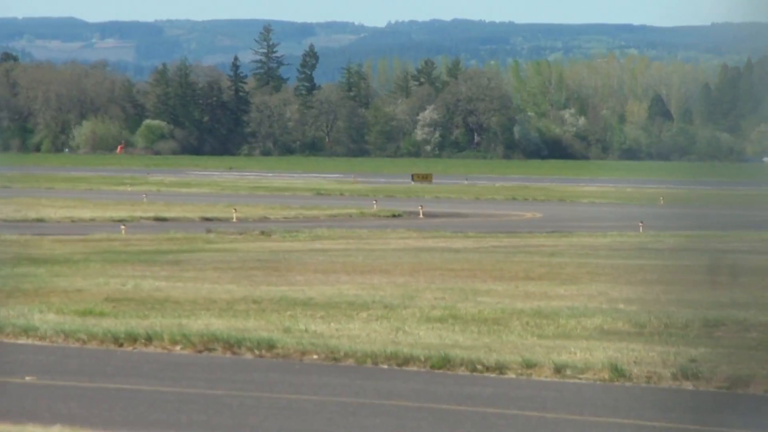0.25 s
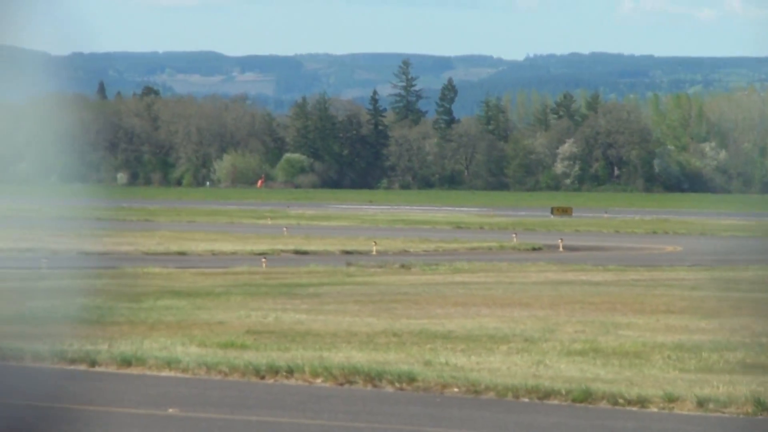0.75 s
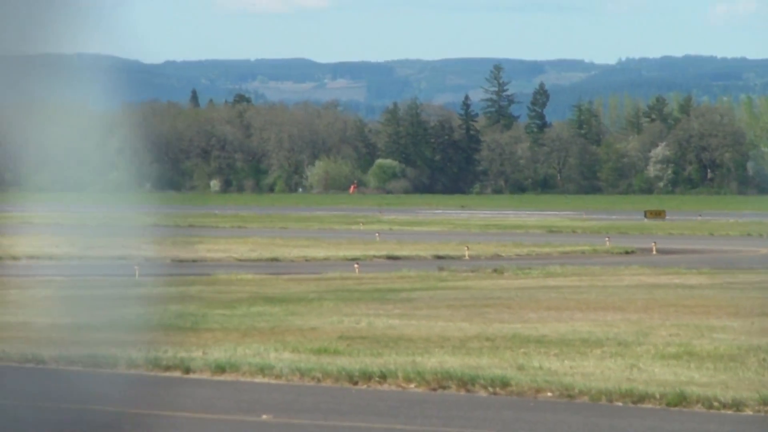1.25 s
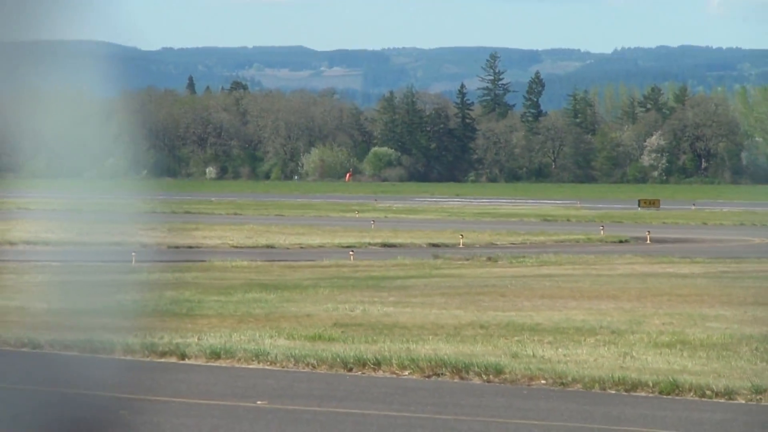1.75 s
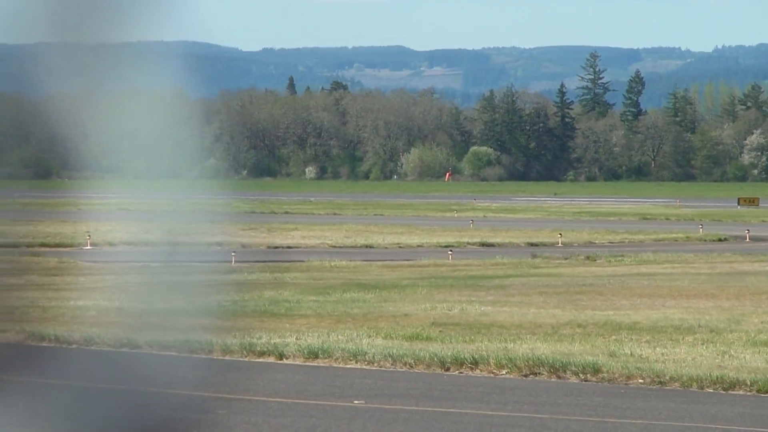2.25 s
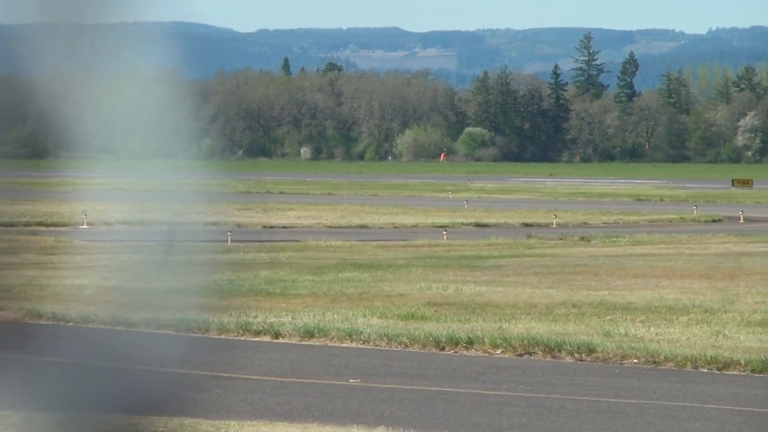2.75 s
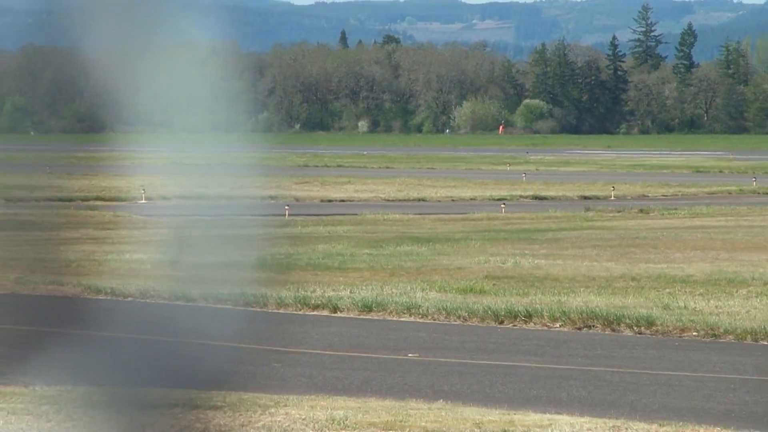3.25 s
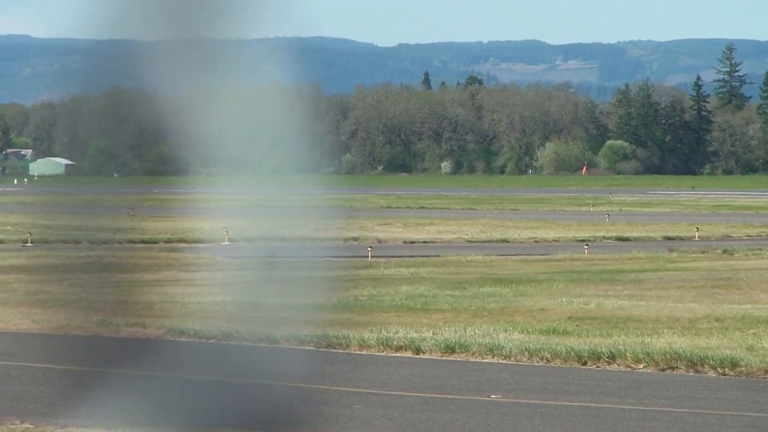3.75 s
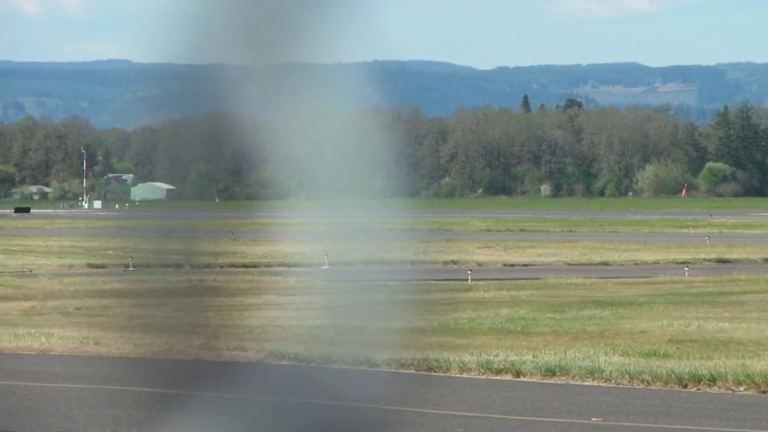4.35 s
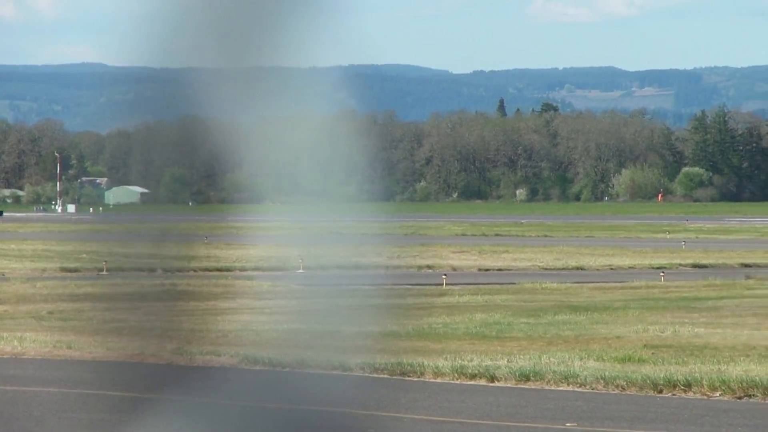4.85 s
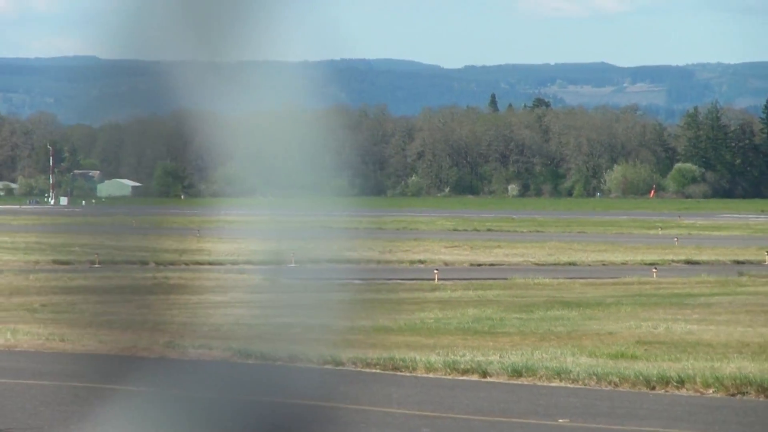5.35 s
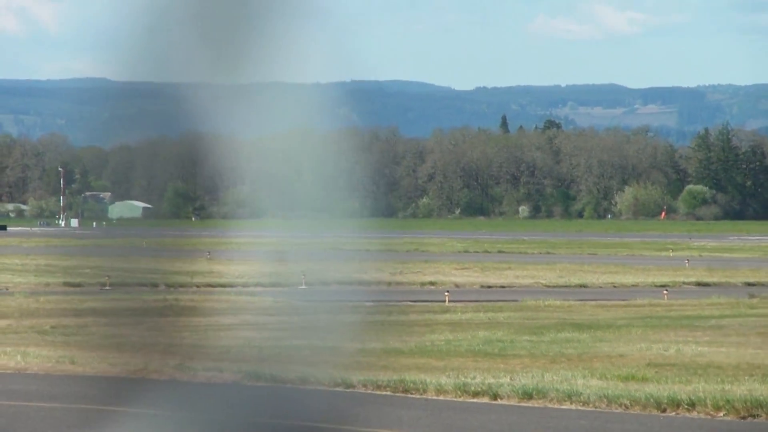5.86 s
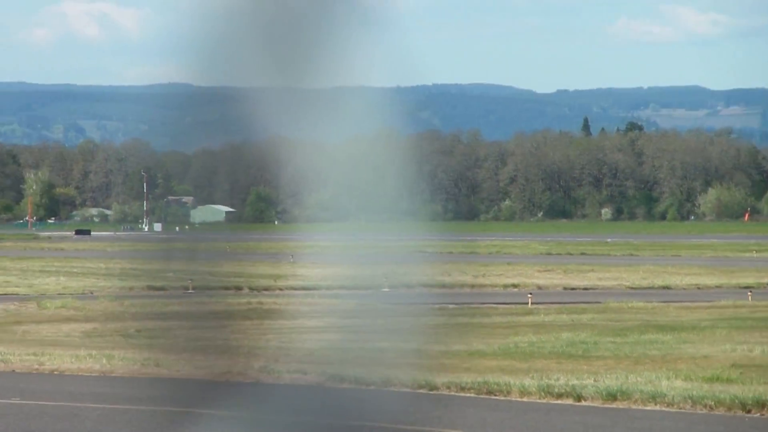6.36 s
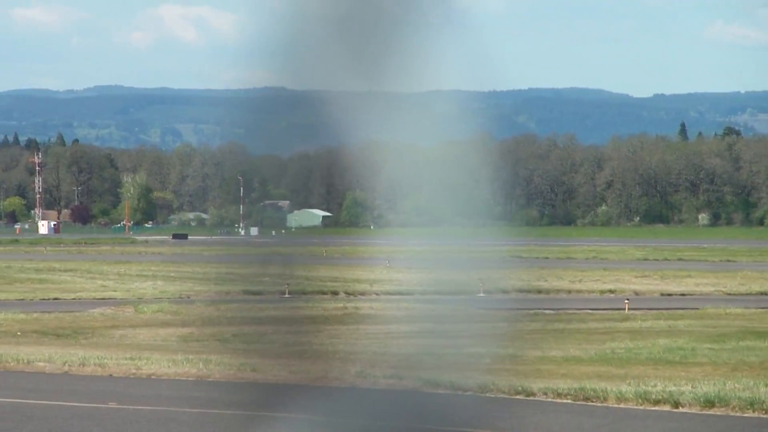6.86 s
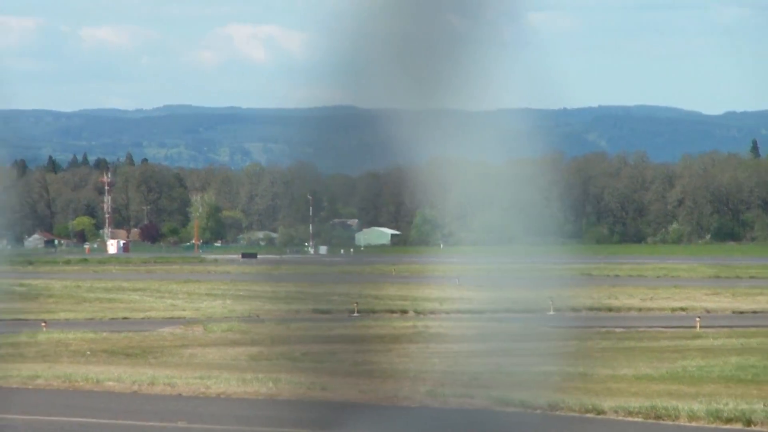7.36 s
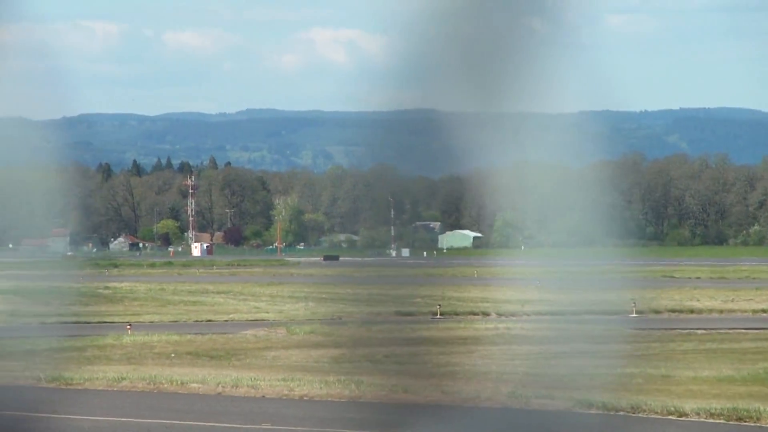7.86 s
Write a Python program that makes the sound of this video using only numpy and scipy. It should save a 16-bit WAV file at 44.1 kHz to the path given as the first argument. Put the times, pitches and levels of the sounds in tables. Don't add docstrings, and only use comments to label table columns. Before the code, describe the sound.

Heavy wind buffets the left microphone and gradually eases, while a camera lens motor purrs and ticks rapidly on the right over faint distant jet roar.

```python
import sys
import numpy as np
from scipy import signal
from scipy.fft import rfft, irfft, next_fast_len
from scipy.io import wavfile
from scipy.ndimage import uniform_filter1d

SR = 44100
rng = np.random.default_rng(int(sys.argv[2]) if len(sys.argv) > 2 else 0)


def elevation(decibels):
    levels = np.asarray(decibels, float)
    return 10 ** (levels / 20)


def master_out(mix):
    frames = np.transpose(np.atleast_2d(mix))
    ceiling = np.clip(frames, -1, 1)
    pcm = np.round(ceiling * 32767).astype(np.int16)
    wavfile.write(sys.argv[1], SR, pcm)


N = 358091
FRAME_HZ, FIRST_FRAME_S = 29.97, 0.0071
DRIVE_START_S, DRIVE_END_S = 5.229, 6.23


def rms_one(x):
    return x / np.sqrt(np.mean(x ** 2) + 1e-20)


def in_time(rows):
    s, level_db = np.transpose(rows)
    return np.interp(np.arange(N) / SR, s, level_db)


def colour(x, spectrum):
    size = next_fast_len(N + 8192)
    hz = np.maximum(np.arange(size // 2 + 1) * SR / size, 1)
    points = np.vstack([spectrum, (1.5 * spectrum[-1][0], -120)])
    gain_db = np.interp(np.log(hz), np.log(points[:, 0]), points[:, 1])
    return irfft(rfft(x, size) * elevation(gain_db), size)[..., :N]


def drift(rate_hz):
    r = np.exp(-2 * np.pi * rate_hz / SR)
    settle = 9000
    return rms_one(signal.lfilter([1], [1, -2 * r, r * r], rng.standard_normal(N + settle))[settle:])


def clicks(times, heights):
    out = np.zeros(N)
    at = np.clip(np.round(np.asarray(times) * SR).astype(int), 0, N - 1)
    np.add.at(out, at, heights)
    return out


def burst(times, heights, decay_s):
    envelope = signal.lfilter([1], [1, -np.exp(-1 / (decay_s * SR))], clicks(times, heights))
    return envelope * rng.standard_normal(N)


def ring(x, hz, width_hz):
    r, w = np.exp(-np.pi * width_hz / SR), 2 * np.pi * hz / SR
    return signal.lfilter([0, np.sin(w)], [1, -2 * r * np.cos(w), r * r], x + 1e-18)


def soften(x, hz):
    return signal.sosfilt(signal.butter(6, hz, fs=SR, output="sos"), x)


def high_pass(x, hz):
    return signal.sosfilt(signal.butter(2, hz, "high", fs=SR, output="sos"), x)


def band(x, low_hz, high_hz):
    return signal.sosfiltfilt(signal.butter(2, [low_hz, high_hz], "band", fs=SR, output="sos"), x)


# t/s, level/dB
GUST = [(0, -20.5), (1.2, -20), (2.8, -21.5), (3.3, -25), (3.8, -24.5), (4.2, -29), (4.42, -28), (4.7, -27),
        (5.4, -31.5), (5.7, -32), (6.0, -20.5), (6.24, -37.5), (6.5, -24), (6.88, -34), (7.1, -24),
        (7.4, -28.5), (7.9, -28.5), (8.12, -25)]
# t/s, peak level/dB, sign (+ pushes, - sucks)
PUFFS = [(0.209, -3.5, -1), (0.335, -4.2, -1), (0.634, -5.7, -1), (0.979, -5.4, 1), (1.173, -4.8, -1),
         (1.229, -4.2, -1), (1.661, -6.4, 1), (1.907, -5.5, 1), (2.065, -3.5, -1), (2.195, -5.0, -1),
         (2.281, -4.9, 1), (2.389, -3.3, -1), (2.915, -7.4, 1), (3.465, -4.6, 1), (3.499, -6.3, -1),
         (4.097, -11.4, -1), (4.632, -11.3, 1), (4.856, -9.9, 1), (5.051, -9.5, 1), (5.577, -8.2, 1),
         (5.841, -9.3, -1), (5.88, -8.6, -1), (5.993, -6.5, 1), (6.442, -9.3, -1), (6.636, -10.2, 1),
         (7.036, -11.4, -1), (7.17, -11.0, -1), (7.567, -12.0, -1), (7.836, -9.5, -1), (8.036, -6.1, -1)]
# f/Hz, level/dB per Hz
WIND_COLOUR = [(30, -38.5), (50, -38), (80, -17.5), (130, -8), (200, 0), (280, 3), (400, -0.5), (550, -8),
               (750, -19), (1000, -31), (1300, -44), (1800, -50.5), (2600, -63)]
# f/Hz, level/dB
LEE_COLOUR = [(30, -31.5), (60, -21.5), (120, -4), (250, -3.5), (700, -5.5), (1100, -36.5), (2000, -35)]
# t/s, peak level/dB, sign
LEE_PUFFS = [
    (2.038, -18, -1),
    (5.04, -21.5, 1),
    (5.151, -21.5, 1),
    (5.792, -32, 1),
]


def wind():
    bright_follows = 2.34
    calm_db = in_time(GUST) + 26
    swell_db = swell()
    trend_db = uniform_filter1d(calm_db, int(0.48 * SR), mode="nearest")
    level_db = -26 + calm_db + swell_db + 1.0 * drift(12.0)
    bass_db = -28.5 + 0.47 * calm_db + 0.64 * drift(2.6)
    bright_db = -38 + bright_follows * trend_db + 0.56 * swell_db + 3.4 * drift(3.1)
    whip = np.clip(1 - 2 * np.abs(np.arange(N) / SR - 0.19) / 0.26, 0, 1)
    bright_db += 11.6 * whip

    churn, puffs = eddies(WIND_COLOUR, np.vstack([PUFFS, small_eddies()]), lumpy_db=4.0, fast_hz=76)
    rumble = churn + 1.03 * rms_one(colour(rng.standard_normal(N), WIND_COLOUR))
    bass = elevation(bass_db - 1.0) * steady(band(rumble, 15, 200))
    body = elevation(level_db - 3.5) * steady(band(churn, 200, 550))
    bright = elevation(bright_db - 2.0) * steady(band(churn, 550, 4000))

    puff_bright_db = np.clip((bright_follows - 1) * trend_db + 1.0, -9, 3)
    puffs = puffs + band(puffs, 600, 4000) * (elevation(puff_bright_db) - 1)
    calm, bumps = eddies(LEE_COLOUR, LEE_PUFFS, lumpy_db=7.0, fast_hz=5.1)
    return np.array([bass + body + bright + puffs, elevation(-47.5) * calm + bumps])


def eddies(spectrum, rows, lumpy_db, fast_hz):
    lumps = elevation(lumpy_db * drift(fast_hz) + 1.0 * drift(4.1))
    churn = colour(lumps * rng.standard_normal(N), spectrum)
    s, peak_db, sign = np.transpose(rows)
    aside = 1 - np.minimum(np.convolve(clicks(s, 0.85), np.hanning(401), "same"), 1)
    top = colour(clicks([1], 0.84), spectrum).max()
    bumps = colour(clicks(s, np.sign(sign) * elevation(peak_db)), spectrum) / top
    return rms_one(churn * aside), bumps


def small_eddies():
    per_s, above_wind_db, spread_db = 9.5, 11, 2.74
    luck = rng.random((200, 3))
    s = (np.arange(len(luck)) + luck[:, 0]) / per_s
    peak_db = np.interp(s, *np.transpose(GUST)) + above_wind_db + spread_db * (4 * luck[:, 1] - 2)
    sign = luck[:, 2] - 0.65
    return np.transpose([s, peak_db, sign])[s < N / SR]


def swell():
    s, peak_db, _ = np.transpose(PUFFS)
    above_db = np.maximum(peak_db - np.interp(s, *np.transpose(GUST)) - 16, 0)
    return signal.fftconvolve(clicks(s, 0.82 * above_db), np.hanning(int(0.16 * SR)), "same")


def steady(x):
    power = uniform_filter1d(uniform_filter1d(x ** 2, 3500), 3500)
    return rms_one(x / np.sqrt(power + 1e-12))


# t/s, level/dB
EFFORT = [(0, -30.5), (0.25, -40.5), (0.5, -34.5), (2.3, -31.5), (3.4, -37), (4.0, -32), (8.12, -33.5)]
# t/s, extra level/dB
HARD_KNOCKS = [
    (1.475, 6),
    (2.61, 9),
    (2.91, 12.5),
    (5.045, 9),
    (7.48, 6.5),
]
# t/s, level/dB
RUB = [(0, -43), (5.22, -41.5), (5.24, -44), (6.22, -45), (6.24, -39.5), (8.12, -42.5)]
# f/Hz, width/Hz, knock level/dB, tick level/dB, rub level/dB
BODY = [(397, 560, -7.5, -26, -23), (921, 107, -2, -26.5, -15), (1542, 109, 3, -19, -6),
        (1836, 188, -20, -13, 3.5), (2320, 350, -18.5, -26, -12)]
# f/Hz, width/Hz, tick level/dB, rub level/dB
BARREL = [(3655, 360, -24.5, -23), (4800, 420, -33, -22.5), (5660, 390, -42, -42), (6050, 3000, -18, -56.5),
          (8600, 1000, -25.5, -56.5)]


def lens_motor():
    frames = FIRST_FRAME_S + np.arange(int(N / SR * FRAME_HZ)) / FRAME_HZ
    running = (frames < DRIVE_START_S - 0.01) | (frames > DRIVE_END_S + 0.03)
    luck = rng.standard_normal((len(frames), 4))
    effort_db = np.interp(frames, *np.transpose(EFFORT))
    for s, extra_db in HARD_KNOCKS:
        effort_db[np.abs(frames - s).argmin()] += extra_db
    knock_s = frames + 0.001408 + 0.00037 * luck[:, 0]
    knock = clicks(knock_s, running * elevation(effort_db + 6.0 - 6.2 * np.abs(luck[:, 1])))

    fields = np.concatenate([frames, frames + 0.5 / FRAME_HZ]) - 0.0004
    uneven_db = 2 * np.concatenate([luck[:, 2], luck[:, 3]])
    strengths = elevation(-36.5 + uneven_db) * np.tile(running, 2)
    rattle = burst(fields, strengths, decay_s=0.002)
    rub = elevation(in_time(RUB) - 18.5 + 1.85 * drift(11)) * rng.standard_normal(N)
    body = np.zeros(N)
    for hz, width_hz, knock_db, tick_db, rub_db in BODY:
        push = elevation(knock_db) * knock + elevation(tick_db) * rattle + elevation(rub_db) * rub
        body += ring(push, hz, width_hz)

    t = np.arange(N) / SR
    driving = (t > DRIVE_START_S) & (t < DRIVE_END_S)
    held = np.where(driving, elevation(-24), 1)
    scatter_s = 0.0002 * rng.standard_normal(len(fields))
    ticks = elevation(-1) * burst(fields, strengths, decay_s=0.0011)
    ticks = ticks + elevation(12) * clicks(fields + scatter_s, strengths)
    barrel = np.zeros(N)
    for k, (hz, width_hz, tick_db, rub_db) in enumerate(BARREL):
        push = elevation(tick_db) * ticks + elevation(rub_db) * rub * held
        barrel += ring(push, hz, width_hz) * (-1) ** k
    return soften(body, hz=2200) + high_pass(barrel, 2800)


# f/Hz, width/Hz, level/dB
TAP_MODES = [(800, 340, 2), (1530, 240, 9), (1770, 100, -3.5), (2460, 170, -12)]


def fingernail_tap():
    tap_s, bounce_s = 0.6141, 0.0013
    tap = clicks([tap_s, tap_s + bounce_s], [1, 0.8])
    thud = sum(elevation(db) * ring(tap, hz, width_hz) for hz, width_hz, db in TAP_MODES)
    thud = soften(thud, hz=2700)
    return elevation(1.2) * thud / np.abs(thud).max()


# t/s, peak level/dB
SNAPS = [
    (.6137, -43),
    (5.228, -42),
    (6.2292, -43),
    (6.2467, -51),
]
# f/Hz, width/Hz, level/dB
SNAP_MODES = [(1870, 640, 9.5), (3650, 600, -3.5), (4840, 860, 4.5), (5460, 450, -4.5), (7200, 1400, -17)]


def snaps():
    s, peak_db = np.transpose(SNAPS)
    strike = clicks(s, elevation(peak_db + 4)) + burst(s, elevation(peak_db - 7.5), decay_s=0.0018)
    return sum(elevation(db) * ring(strike, hz, width_hz) for hz, width_hz, db in SNAP_MODES)


# middle t/s, f/Hz, level/dB, hold t/s
HIGH_WHINE = [(5.24, 10600, -70, .02), (5.33, 9300, -71, .005), (5.355, 10500, -70, .025),
              (5.39, 9400, -69, .015), (5.425, 10600, -69, .02), (5.54, 10500, -73, .025),
              (5.58, 10600, -70, .04), (5.64, 10600, -69, .03), (5.675, 8800, -70, .01),
              (5.725, 9250, -70, .015), (5.75, 10600, -74, .01), (5.835, 10500, -71, .015),
              (5.89, 9500, -70, .03), (5.925, 10700, -73, .015), (6.04, 10550, -72, .045)]
# middle t/s, f/Hz, level/dB, hold t/s
LOW_WHINE = [(5.277, 7330, -65, .015), (5.425, 5280, -73, .02), (5.49, 8200, -62, .01),
             (5.573, 5280, -72, .02), (5.603, 6570, -71, 0), (5.781, 7310, -65, .015), (5.99, 7060, -69, 0),
             (6.095, 6580, -67, .04), (6.178, 7000, -68, .01), (6.219, 8780, -63, .022)]


def drive():
    high = whine(HIGH_WHINE, rest_hz=10500, rest_db=-81, glide_s=0.018, wobble_hz=130)
    low = whine(LOW_WHINE, rest_hz=5290, rest_db=-85, glide_s=0.05, wobble_hz=150)
    return high * elevation([[-4], [-4]]) + low * elevation([[-5], [2]])


def whine(rows, rest_hz, rest_db, glide_s, wobble_hz):
    span = slice(int(DRIVE_START_S * SR), int(DRIVE_END_S * SR))
    t = np.arange(span.start, span.stop) / SR
    s, hz, db, hold_s = np.transpose(rows)[:, :, None]
    reach = np.clip(1 - (np.abs(t - s) - hold_s / 2) / glide_s, 0, 1)
    nearest = reach.argmax(axis=0)
    reach = reach.max(axis=0)
    pitch_hz = rest_hz + (hz[nearest, 0] - rest_hz) * reach + wobble_hz * drift(150)[span]
    level_db = rest_db + (db[nearest, 0] - rest_db) * reach + 4 * drift(40)[span]
    phase = 2 * np.pi * np.cumsum(pitch_hz) / SR
    tone = np.sin(phase) + elevation(-24) * np.sin(2 * phase)
    out = np.zeros(N)
    out[span] = np.sqrt(2) * elevation(level_db) * tone
    return out


# middle t/s, multiple of the step rate
BEEPS = [(.218, 9), (1.399, 12), (2.65, 10), (2.752, 11), (2.769, 13), (2.937, 11), (2.953, 10),
         (2.985, 14), (3.153, 13), (3.17, 11), (3.237, 8), (3.254, 9), (3.32, 9), (3.37, 8), (3.404, 8),
         (3.62, 13), (3.637, 11), (3.688, 9), (4.205, 8), (4.238, 8), (4.271, 8), (4.305, 8), (4.621, 9),
         (4.888, 9), (6.973, 11), (7.107, 11), (7.158, 12), (7.508, 10), (7.975, 8), (8.009, 8)]


def stepper():
    step_hz = 479.52
    out = np.zeros(N)
    t = np.arange(int(SR / FRAME_HZ / 2)) / SR
    fade = signal.windows.tukey(len(t), 0.2)
    for (s, multiple), luck in zip(BEEPS, rng.standard_normal(len(BEEPS))):
        start = int((s - t[-1] / 2) * SR)
        level = np.sqrt(2) * elevation(-67.5 + 1.2 * luck)
        out[start:start + len(t)] += level * fade * np.sin(2 * np.pi * multiple * step_hz * t)
    return out


# f/Hz, level/dB per Hz
JET_COLOUR = [(200, -28.5), (500, 3), (900, 8.5), (1300, -2), (1800, 4.5), (2200, -10.5), (2700, -30),
              (3500, -46.5), (4700, -39)]
# t/s, level/dB
JET_FADE = [(0, -54), (5.2, -47), (6.2, -48), (8.12, -50)]


def jet():
    shared, left, right = rng.standard_normal((3, N))
    roar = rms_one(colour(np.array([shared + 4.2 * left, shared + 2.4 * right]), JET_COLOUR))
    return roar * elevation(in_time(JET_FADE) + 3.1 * drift(5.4))


# t/s, level/dB
SCAN = [(0, -79), (1.5, -74.5), (2.5, -68), (8.12, -68)]
# f/Hz, level/dB per Hz
HISS_COLOUR = [(3500, -3.5), (4050, -14), (4700, -3), (5400, -1.5), (8500, -0.5), (9500, -5.5),
               (11200, -17), (11800, -40), (13800, -44), (14500, -19.5), (15600, -14.5)]


def electronics():
    t = np.arange(N) / SR
    flip = np.tanh(40 * np.sin(np.pi * FRAME_HZ * (t - FIRST_FRAME_S)))
    scan = np.sqrt(2) * elevation(in_time(SCAN)) * flip * np.sin(2 * np.pi * 7867.13 * t)
    clock_low = np.sqrt(2) * elevation(-88) * np.sin(2 * np.pi * 9000 * t)
    clock_high = np.sqrt(2) * elevation(-100) * np.sin(2 * np.pi * 15000 * t)
    hiss = elevation(-65) * rms_one(colour(rng.standard_normal((2, N)), HISS_COLOUR))
    return hiss + scan * elevation([[-10], [0]]) + (clock_low + clock_high) * elevation([[-3], [3]])


# t/s, peak level/dB
CRACKS = [(0.0268, -61), (0.0722, -73), (0.1925, -65), (0.976, -64), (0.978, -59), (1.2281, -61),
          (1.9026, -55), (2.0624, -56)]


def overload_cracks():
    s, peak_db = np.transpose(CRACKS)
    return signal.lfilter([1], [1, -0.8], clicks(s + 0.0012, -elevation(peak_db + 32)))


def widen(left, right):
    share = 0.327
    return np.array([left - share * right, right - share * left])


def scene():
    body = high_pass(lens_motor() + fingernail_tap() + snaps(), 150)
    body = soften(body, hz=9850)
    treble = high_pass(body, 5000)
    far_side = np.roll(body, 3) * elevation(-19.0) + np.roll(treble, 7) * elevation(-34.5)
    mechanism = np.array([far_side, body]) + drive() + stepper() * elevation([[-6], [2.5]])
    return wind() + mechanism + jet()


def top_cut(x):
    return signal.sosfilt(signal.butter(12, 15800, fs=SR, output="sos"), x)


def record(dry):
    x = high_pass(widen(*dry) + electronics(), 50)
    for hz in (3000, 4000, 5000):
        x = signal.lfilter(*signal.iirnotch(hz, hz / 400, fs=SR), x)
    crack = overload_cracks()
    return top_cut(x + widen(crack, 0 * crack))


dry = scene()
out = record(dry)
master_out(out)
```